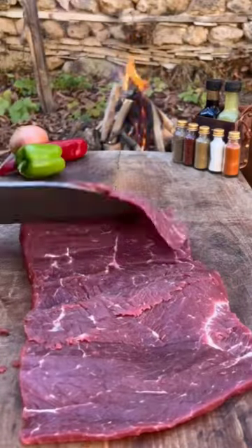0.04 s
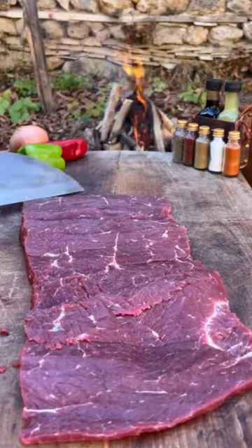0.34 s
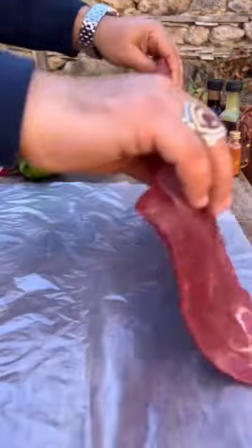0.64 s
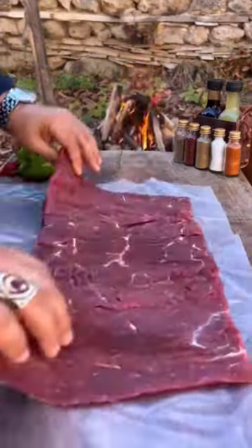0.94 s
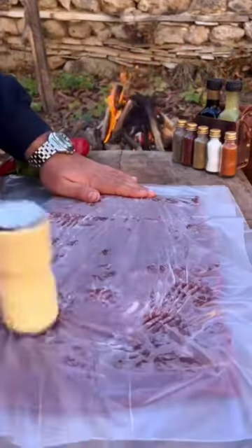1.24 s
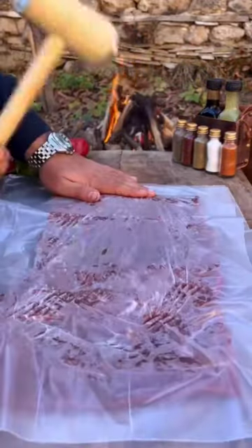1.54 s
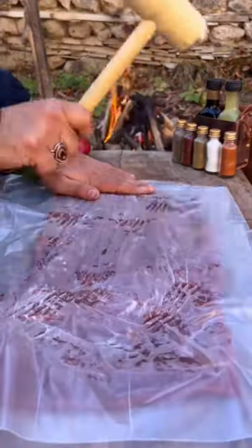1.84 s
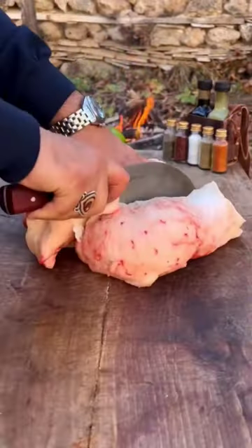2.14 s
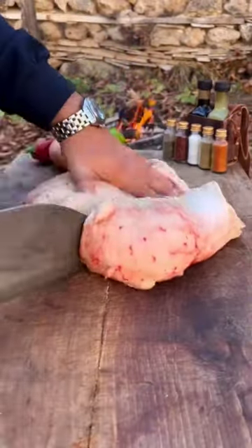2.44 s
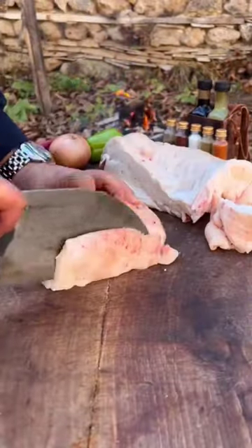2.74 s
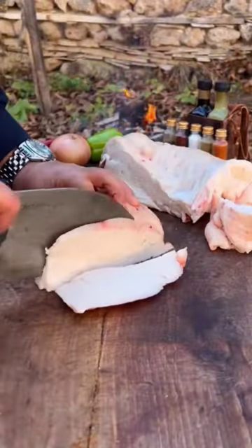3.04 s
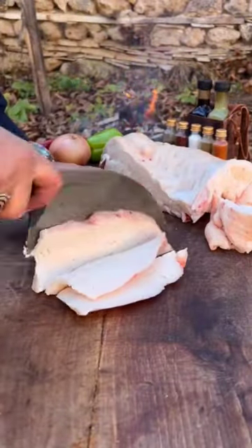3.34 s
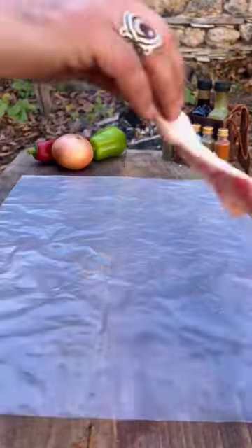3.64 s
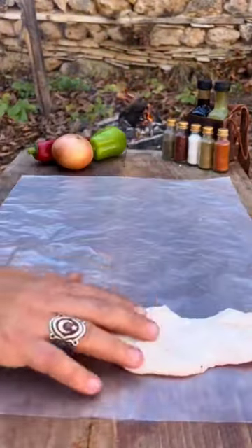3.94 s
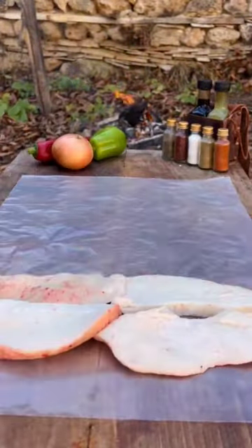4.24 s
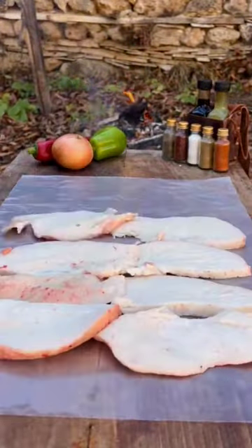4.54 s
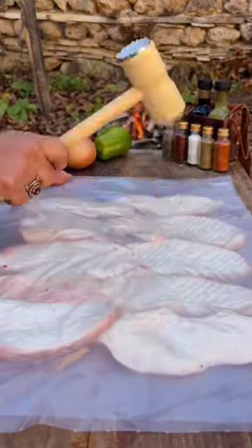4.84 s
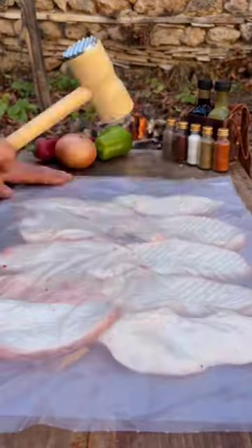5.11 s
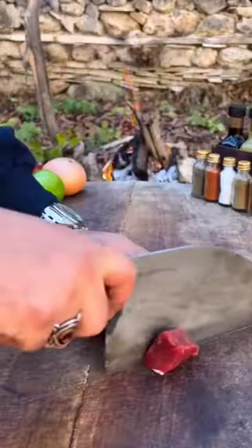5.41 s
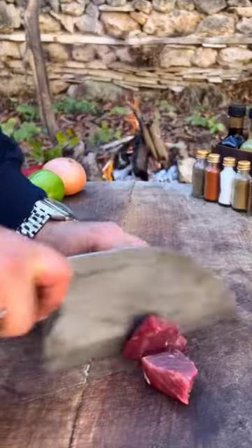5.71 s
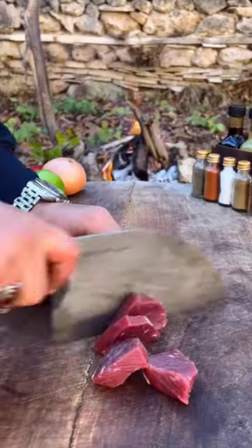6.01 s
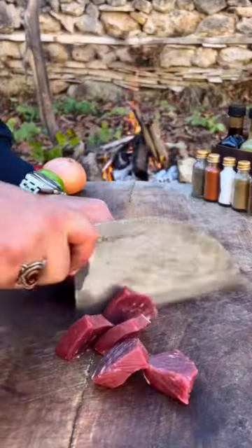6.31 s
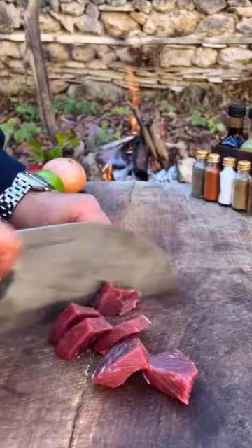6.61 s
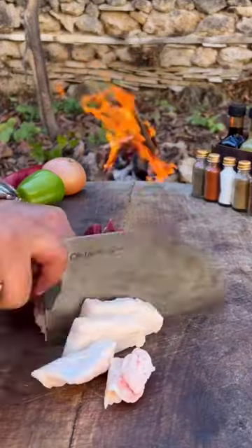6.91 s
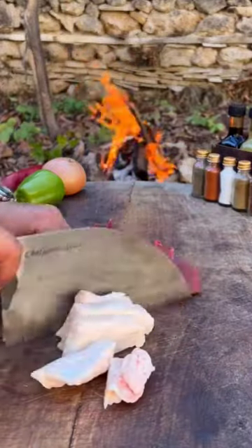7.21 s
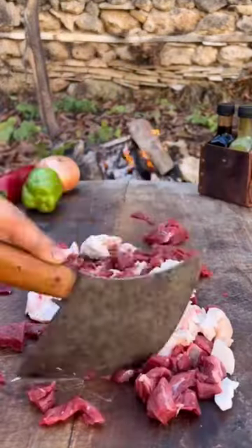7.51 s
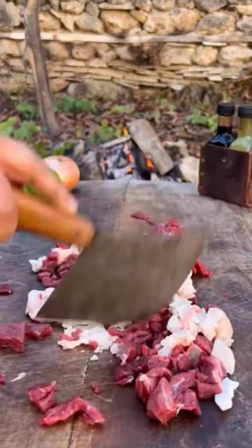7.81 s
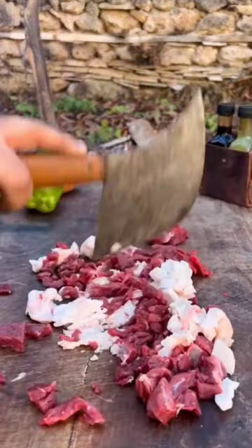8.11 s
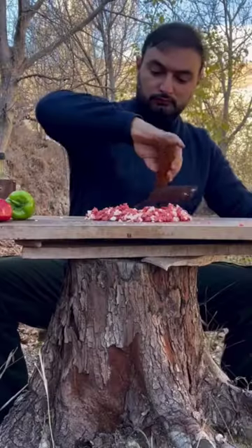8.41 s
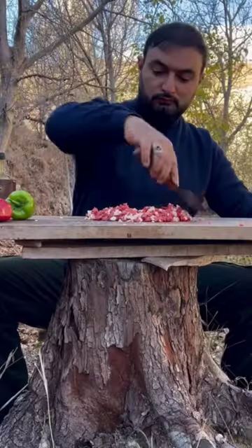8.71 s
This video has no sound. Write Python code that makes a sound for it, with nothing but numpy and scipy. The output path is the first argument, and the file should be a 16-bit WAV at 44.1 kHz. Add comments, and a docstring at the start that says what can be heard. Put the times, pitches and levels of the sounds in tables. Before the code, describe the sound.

Outdoors, a small bird twitters briefly and plastic film crinkles. Close by, a mallet pounds meat six times in quick succession, making a thick wooden table knock. A cleaver slices softly, then a second, duller run of mallet blows follows. Louder rasping slices lead into a fast burst of chopping and a few lighter, more distant chops. A faint low rumble of open air lies underneath.

```python
"""Meat on a wooden table outdoors

Close by, a mallet pounds meat under plastic film and the thick table rings in damped modes.
A cleaver saws slices with a grainy rasp, then minces in a quick run; the last chops are farther off.
Film crinkles and wet meat ticks and peels. A small bird twitters at the start and a faint whir
comes in at the end, over the low rumble of open air."""
import sys
import numpy as np
from scipy import signal
from scipy.fft import rfft, irfft, next_fast_len
from scipy.io import wavfile
from scipy.ndimage import uniform_filter1d, map_coordinates

SR = 44100
rng = np.random.default_rng(int(sys.argv[2]) if len(sys.argv) > 2 else 0)


def dump_mix(stems):
    """Bounce the given channels to the path in sys.argv[1] as a 16-bit WAV at rate SR."""
    frames = np.atleast_2d(stems).T  # one column per channel
    limited = np.clip(frames, -1, 1)  # hard clip at full scale
    pcm = np.round(limited * 32767).astype(np.int16)
    wavfile.write(sys.argv[1], SR, pcm)


N = 386316
T = np.arange(N) / SR
BLOW_N, LEAD_N = SR // 6, SR // 40  # samples in one blow, and before its contact
AGE_S = (np.arange(BLOW_N) - LEAD_N) / SR  # time since contact

# tool dragging on meat and wood: freq_hz, density_db
DRAG_SPECTRUM = [(53, -43.5), (90, -6.5), (124, -12), (199, 5), (293, -3.5), (333, -11), (389, 1), (530, 0),
                 (730, -22), (800, -11.5), (1040, -37.5), (1760, -120)]
# smack of a contact: freq_hz, density_db
SMACK_SPECTRUM = [(100, -39.5), (400, -25.5), (1000, 9.5), (3000, 11.5), (5000, -0.5), (8000, -8.5),
                  (15000, -37)]
# plastic film: freq_hz, density_db
CRINKLE_SPECTRUM = [(290, -45.5), (500, -15.5), (545, 0), (1240, 0), (3060, -2.5), (4070, -1), (4910, -3),
                    (7780, 0.5), (15500, -12.5)]


def mallet():
    """The head squeezes air from under the film, slaps it, and bears down again through the meat."""
    # blows: start_s, thud_db, knock_db, snap_db, hardness_db, rebound_gain_db
    pounds = [(1.0716,-27.5,-28.5,-6,0,-4), (1.236,-28,-29.5,-2,4,4), (1.406,-23.5,-26,-4.5,5.5,-2.5),
              (1.5637,-19.5,-27,-4.5,4,-8), (1.7257,-16,-22.5,-5,0,-16.5),
              (1.889,-18.5,-20.5,-7.5,-3,-19.5), (4.6076,-19.5,-26.5,-20,-8,-3.5),
              (4.7499,-16.5,-18,-15.5,-5.5,-12.5), (4.883,-18,-19.5,-24,-4.5,-28),
              (5.02,-19,-23.5,-16,-6,-17.5), (5.142,-18,-21,-17.5,-10,-10.5),
              (5.2807,-20,-19.5,-19.5,-2.5,-14)]
    # slap of the film: freq_hz, density_db
    snap_spectrum = [(2500, -16), (5100, -8.5), (6500, -3), (8500, 2), (11500, -12.5), (14000, -14.5),
                     (15500, -8.5)]
    # crack of the head: freq_hz, density_db
    crack_spectrum = [(700, -20.5), (1400, 9), (1800, -2.5), (2600, -6), (3100, -4), (3500, -3), (4200, -3),
                      (5200, -18.5), (8000, -24)]
    out = np.zeros(N)
    for s, thud_db, knock_db, snap_db, hardness_db, rebound_db in pounds:
        crack_db = thud_db - 12 + hardness_db
        tilt_db_oct = -6.5 + 2.3 * hardness_db  # harder is brighter
        ring_scale = .55 * amp(-.23 * hardness_db)  # softer rings longer
        envelope = swell(.0026, .014) + amp(-24) * swell(.022, .1)
        add(out, s + .001, amp(snap_db - 12) * envelope * contact(snap_spectrum, depth_db=2))
        add(out, s + .0012, amp(crack_db) * burst(envelope * contact(crack_spectrum, depth_db=0)))
        strike = table(thud_db, knock_db, ring_scale, tilt_db_oct, attack_s=.00069, rattle=.54)
        add(out, s + .00107, strike)
        rebound = table(thud_db, knock_db, 1.31 * ring_scale, tilt_db_oct, attack_s=.0023, rattle=1)
        add(out, s + .0115, amp(rebound_db) * rebound)
        add(out, s, amp(thud_db - 25.5) * swell(.062, .11) * noise(DRAG_SPECTRUM))
    return out


def table(thud_db, knock_db, ring_scale, tilt_db_oct, attack_s, rattle, pitch=1):
    """The struck table: low bending modes, higher knocking modes and a dense rattle of planks."""
    # table top: freq_hz, level_db, base_t60_s
    modes = [(118.5, -6.5, 0.063), (168.5, -1.5, 0.076), (240, 0, 0.073), (329, -6, 0.084),
             (471, -1, 0.063), (543.6, -1.5, 0.041), (614, -2.5, 0.04), (799, -7, 0.049),
             (902, -6.5, 0.061), (1130, -13.5, 0.036), (1376, -12, 0.032)]
    # plank rattle: freq_hz, density_db
    wood_spectrum = [(80, -44), (280, -20), (450, 7.5), (900, 2.5), (1400, -12.5), (2200, -22.5),
                     (5000, -40)]
    load = 1 + .05 * rng.standard_normal()  # weight of tool and meat shifts the low modes
    thud = ring(modes[:4], ring_scale, 2 * attack_s, pitch=pitch * load)
    planks = burst(noise(wood_spectrum) * swell(.0023, .095 * ring_scale))
    knock = ring(modes[4:], ring_scale, attack_s, tilt_db_oct, pitch) + rattle * planks
    bass_cut = signal.butter(2, 260, "high", fs=SR, output="sos")  # the knock stays clear of the bass
    return amp(thud_db) * thud + amp(knock_db) * burst(signal.sosfilt(bass_cut, knock))


def mincing():
    """The cleaver goes through the mince and bites into the wood with a short crack."""
    # close chops: start_s, force_db, edge_db, ring_scale, tilt_db_oct
    chops = [(7.341,-27,-26,1.18,6.5), (7.4831,-18.5,-8.5,0.67,-2.5), (7.6025,-18,-11,0.65,-2.5),
             (7.7412,-18.5,-13,0.6,2), (7.8562,-19.5,-16,0.65,4.5), (7.9923,-20.5,-26.5,.67,6)]
    # edge contact: freq_hz, density_db
    edge_spectrum = [(100, -34.5), (500, -17), (1300, 12), (2000, -1), (3200, -11.5), (4600, -26.5),
                     (8500, -31.5), (12000, -47), (15500, -44)]
    # wood fibres splitting: freq_hz, density_db
    bite_spectrum = [(1200, -23), (2500, 6), (4000, -2), (5500, -16), (8500, -17), (12000, -35.5)]
    out = np.zeros(N)
    for s, force_db, edge_db, ring_scale, tilt_db_oct in chops:
        envelope = swell(.0047, .018) + amp(-11.5) * swell(.023, .044)
        add(out, s + .0021, amp(edge_db - 6.5) * envelope * contact(edge_spectrum, depth_db=4))
        bite = burst(swell(.005, .016) * contact(bite_spectrum, depth_db=2))
        add(out, s + .0015, amp(edge_db - 31) * bite)
        strike = table(force_db - 11, force_db, ring_scale, tilt_db_oct, attack_s=.0018, rattle=.21)
        add(out, s + .0007, strike)
        add(out, s, amp(force_db - 14) * swell(.022, .11) * noise(DRAG_SPECTRUM))
    return out


def slicing():
    """The edge saws through fibres: tiny slips shake the table and hiss along the blade."""
    # strokes, one list for fat, one for lean: start_s, length_s, rasp_db, drag_db, hiss_db
    cuts = [
        [(1.91,.11,-55.5,-50.5,-66), (2.19,.23,-47.5,-46.5,-58.5), (2.44,0.1,-58,-57.5,-66),
         (2.56,0.21,-62,-53,-81), (2.74,0.18,-49.5,-43.5,-65.5), (3.01,.22,-49,-45.5,-65),
         (3.27,0.14,-66.5,-58.5,-68), (3.4,.17,-45,-50,-59.5)],
        [(5.33,0.071,-46,-45.5,-55), (5.435,0.21,-44,-36,-50), (5.655,.17,-40,-38.5,-50.5),
         (5.85,0.22,-40,-38.5,-51.5), (6.085,0.21,-40,-41.5,-51.5), (6.32,.18,-39.5,-41.5,-51.5),
         (6.525,0.19,-40,-43,-52), (6.725,0.15,-41.5,-39,-51.5), (6.945,0.15,-39.5,-46.5,-53),
         (7.155,0.18,-41.5,-52.5,-55)],
    ]
    # rasp, one list for fat, one for lean: freq_hz, density_db
    rasp_spectra = [
        [(320, -24), (550, -1.5), (590, -22), (679, 3), (748, -10.5), (839, -2), (1160, -7.5), (1410, -4),
         (1680, -18.5), (2020, -7), (2290, -15), (4010, -16.5), (4500, -24), (5850, -27), (9900, -120)],
        [(320, -5), (550, 9), (729, -4.5), (884, 9), (966, -1), (1060, 7), (1150, -7), (1420, 4.5),
         (1640, -12.5), (2020, -5.5), (2330, -12), (2630, -5), (4500, -19), (5850, -55), (9900, -120)],
    ]
    # blade hiss: freq_hz, density_db
    hiss_spectrum = [(2240, -27), (3800, -10), (4180, -1), (5100, -7), (6050, 0.5), (6880, -3.5), (8070, 0),
                     (8810, -2.5), (11900, -13), (14900, -14.5), (15500, -20)]
    # blade breaking through onto the table: start_s, thud_db
    landings = [(2.216,-53.5), (2.79,-48.5), (3.0284,-51), (5.501,-40.5), (5.7148,-37.5), (5.786,-43.5),
                (5.877,-36), (6.13,-36.5), (6.2459,-36.5), (6.575,-47), (6.766,-43)]
    out = np.zeros(N)
    catch = amp(1.5 * wobble(70))  # the edge catches and lets go
    for cut, rasp_spectrum in zip(cuts, rasp_spectra):
        drag = sum(amp(db) * stroke(s, length_s, power=.5) for s, length_s, _, db, _ in cut)
        rasp = sum(amp(db) * stroke(s, length_s, power=.8) for s, length_s, db, _, _ in cut)
        hiss = sum(amp(db) * stroke(s, length_s, power=1) for s, length_s, _, _, db in cut)
        sawing = rasp > 0
        layers = [(drag, DRAG_SPECTRUM, 400, .99, 2.5),
                  (rasp, rasp_spectrum, 1800, .8, 3.8),
                  (hiss, hiss_spectrum, 2500, .8, 3.8)]
        for envelope, spectrum, per_s, bed, depth_db in layers:
            slips = patchy(grains(spectrum, per_s, bed, size=2 ** 17), depth_db)
            out[sawing] += envelope[sawing] * slips[:sawing.sum()]
    out *= catch
    for s, db in landings:
        landing = table(db, db - 11, ring_scale=1.15, tilt_db_oct=-2, attack_s=.00073, rattle=1.6)
        add(out, s + .00076, landing)
    return out


def far_chops():
    """Lighter chops from farther off knock a little higher and leave the blade ringing."""
    # far chops: start_s, force_db, edge_db, ring_scale, tilt_db_oct
    chops = [(8.4353,-34,-24.5,0.9,4.5), (8.5764,-36.5,-26,0.98,-20), (8.5956,-36,-34.5,1,-35),
             (8.736,-31,-26,0.96,-16)]
    # cleaver blade: freq_hz, level_db, base_t60_s
    blade_modes = [(500.4, 10, 0.12), (855, -15, 0.21), (1670, 5.5, 0.051), (2048, -6.5, 0.2),
                   (2710, -17, 0.27), (6960, -32, 0.086)]
    out = np.zeros(N)
    for s, force_db, edge_db, ring_scale, tilt_db_oct in chops:
        envelope = swell(.003, .024) + amp(-24) * swell(.0047, .25)
        add(out, s + .00131, amp(edge_db - 8.5) * envelope * contact(SMACK_SPECTRUM, depth_db=3.5))
        thud_db = force_db - 21
        strike = table(thud_db, force_db, ring_scale, tilt_db_oct, attack_s=.0018, rattle=.55, pitch=1.14)
        add(out, s + .0015, strike)
        add(out, s + .00108, amp(edge_db - 13.5) * ring(blade_modes, ring_scale=.66, attack_s=.0023))
    return out


def handling():
    """Film crinkles under the hand and meat flops on the table."""
    # sweeps over the film: start_s, length_s, level_db
    sweeps = [(0.492,0.098,-63), (0.669,0.14,-51.5), (0.8,.24,-53.5), (3.768,0.072,-51.5), (4.145,0.11,-71)]
    # meat laid down, hand bumps: start_s, smack_db, thud_db, knock_db, ring_scale
    bumps = [(0.209,-31.5,-48.5,-46.5,1.34), (0.3492,-28,-42.5,-48,1.4), (0.9975,-24,-52.5,-53.5,1),
             (1.934,-42,-39.5,-60,1.1), (3.792,-24.5,-45.5,-36,0.84), (4.4807,-29,-54.5,-56,.6),
             (5.168,-18,-44,-36,0.83), (8.1305,-36.5,-62,-51,0.25), (8.206,-34,-41,-42.5,0.56)]
    crinkle = patchy(grains(CRINKLE_SPECTRUM, per_s=1500, bed=.9, size=N), depth_db=2)
    out = crinkle * sum(amp(db) * stroke(s, length_s, power=.45) for s, length_s, db in sweeps)
    for s, smack_db, thud_db, knock_db, ring_scale in bumps:
        add(out, s + .0022, amp(smack_db - 19.5) * swell(.0032, .06) * noise(SMACK_SPECTRUM))
        bump = table(thud_db, knock_db, ring_scale, tilt_db_oct=-2.5, attack_s=.00045, rattle=.9)
        add(out, s + .001, bump)
    return out


def ticks():
    """Film and wet surfaces tick as they part: a few clear ticks among faint random ones."""
    # clear ticks: start_s, level_db
    clear_ticks = [(0.172,-39.5), (0.45,-43), (0.96,-33.5), (1.175,-45.5), (1.8195,-39), (2.0705,-35.5),
                   (3.7392,-41), (3.9359,-52), (3.9725,-47.5), (4.1602,-42.5), (4.1954,-37), (4.372,-38.5),
                   (5.3115,-39), (7.459,-46), (7.882,-36.5)]
    faint_per_s, faint_db, spread_db = 4, -45.5, .5
    out = np.zeros(N)
    envelope = swell(.0036, .014) + amp(-13) * swell(.0027, .063)
    for s, db in clear_ticks:
        add(out, s + .0011, amp(db - 8.5) * envelope * noise(CRINKLE_SPECTRUM))
    onsets = rng.random(N) < faint_per_s / SR
    impulses = onsets * amp(faint_db + spread_db * rng.standard_normal(N))
    tick = swell(.0053, .045) * noise(CRINKLE_SPECTRUM)
    return out + signal.fftconvolve(impulses, tick / np.abs(tick).max())[:N]


def squelches():
    """Wet meat peels off the mallet or blade as it lifts."""
    # lifts: start_s, length_s, level_db
    lifts = [(1.655,0.058,-63), (4.789,0.066,-67.5), (5.156,0.065,-61), (7.681,0.037,-64.5),
             (7.888,0.067,-62), (8.229,0.058,-68)]
    # wet peeling: freq_hz, density_db
    peel_spectrum = [(500, -13.5), (2000, -35), (4200, 5.5), (8000, -4.5), (15000, -7)]
    out = np.zeros(N)
    for s, length_s, db in lifts:
        envelope = np.sin(np.pi * np.clip(AGE_S / length_s, 0, 1))
        add(out, s, amp(db) * envelope * grains(peel_spectrum, per_s=760, bed=.27))
    return out


def bird():
    """Six whistled chirps, each a rise and a quick drop, then closing notes; foliage smears them."""
    # closing notes: start_s, length_s, start_hz, end_hz, level_db
    notes = [(0.333,0.048,2130,2790,-46), (0.37,0.039,4150,2830,-49), (.456,0.02,2970,1730,-43.5),
             (0.548,0.11,7030,6770,-61)]
    period_s, rise_s, drop_s = .056, .022, .011
    out = np.zeros(N)
    for s in .0015 + period_s * np.arange(6):
        rise_db, drop_db = 2 * rng.standard_normal(2) + [-48.5, -46]
        top_hz = 8530 * (1 + .025 * rng.standard_normal())
        add(out, s - rise_s, whistle(rise_s, start_hz=6200, end_hz=top_hz, db=rise_db))
        add(out, s, whistle(drop_s, start_hz=top_hz, end_hz=3400, db=drop_db))
    for s, *note in notes:
        add(out, s, whistle(*note))
    foliage = (rng.standard_normal(BLOW_N) * swell(.001, t60_s=.07))[LEAD_N:]
    return out + amp(-8) * signal.fftconvolve(out, foliage / np.linalg.norm(foliage))[:N]


def whistle(length_s, start_hz, end_hz, db):
    """One gliding note."""
    progress = np.clip(AGE_S / length_s, 0, 1)
    phase = 2 * np.pi * np.cumsum(start_hz * (end_hz / start_hz) ** progress) / SR
    return amp(db) * np.sin(np.pi * progress) * np.sin(phase)


def whir():
    """A faint narrow band of noise that wanders in pitch."""
    # course of the whir: time_s, pitch_hz, level_db
    course = [(8.133, 1550, -65), (8.171, 1780, -55.5), (8.268, 1650, -53.5), (8.35, 1530, -61.5),
              (8.622, 1550, -69), (8.75, 1750, -51)]
    # skirt around its pitch: offset_hz, density_db
    skirt = [(90, 0), (300, -14), (1500, -32), (5000, -50)]
    s, hz, db = np.transpose(course)
    phase = 2 * np.pi * np.cumsum(np.interp(T, s, hz)) / SR
    return amp(np.interp(T, s, db, left=-120)) * noise(skirt, N) * np.sin(phase)


def open_air():
    """Low rumble and soft hush from all around, alike at both ears only in the bass."""
    # air levels: time_s, rumble_db, hush_db
    levels = [(0,-57.5,-61.5), (.7,-58.5,-67.5), (2.9,-60,-62), (4.2,-61,-69), (5.2,-64.5,-68),
              (6.1,-53.5,-58.5), (7.1,-54,-60.5), (7.4,-65,-69), (8.05,-64,-72.5), (8.2,-59.5,-62.5),
              (8.76,-57,-66)]
    # rumble: freq_hz, density_db
    rumble_spectrum = [(13, -35.5), (22, -26), (65, 5), (75, -2.5), (92, 0), (129, -4.5), (157, -4.5),
                       (400, -16.5), (520, -57.5), (880, -120)]
    # hush: freq_hz, density_db
    hush_spectrum = [(120, -33.5), (250, -12), (450, -3), (1000, -9.5), (2200, -15.5), (5500, -20.5),
                     (8000, -22), (11000, -25.5), (15500, -30.5)]
    # stereo width: freq_hz, side_gain_db
    width = [(70, -28), (220, -14), (600, -6), (4000, -5)]
    s, rumble_db, hush_db = np.transpose(levels)
    rumble, hush = amp(np.interp(T, s, rumble_db)), amp(np.interp(T, s, hush_db))
    mid, side = [rumble * noise(rumble_spectrum, N) + hush * noise(hush_spectrum, N) for _ in range(2)]
    side = coloured(side, width)
    return np.array([mid + side, mid - side])


def ring(modes, ring_scale, attack_s, tilt_db_oct=0, pitch=1):
    """Damped modes; each spot struck excites them a little differently."""
    t = np.maximum(AGE_S, 0)
    hz, db, t60_s = np.transpose(modes)[:, :, None]
    scatter_db = 2 * rng.standard_normal(hz.shape)
    detune = 1 + .008 * rng.standard_normal(hz.shape)
    sign = (-1) ** np.arange(len(modes))[:, None]
    gain = sign * amp(db + scatter_db + tilt_db_oct * np.log2(hz / hz[0]))
    decay = np.exp(-np.log(1000) * t / (t60_s * ring_scale))
    tones = gain * decay * np.sin(2 * np.pi * hz * pitch * detune * t)
    return burst(tones.sum(axis=0) * (1 - np.exp(-t / attack_s)))


def contact(spectrum, depth_db):
    """Noise for one blow, uneven in colour by depth_db."""
    return patchy(noise(spectrum), depth_db)


def patchy(x, depth_db):
    """Resonances shift as the contact moves: random gain over frequency and time, rms 1 out."""
    bins = signal.stft(x, nperseg=512)[2]
    field = uniform_filter1d(rng.standard_normal(bins.shape), size=3, axis=0)
    field = uniform_filter1d(field, size=24, axis=1)
    bins = bins * amp(depth_db * unit(field))
    return unit(signal.istft(bins, nperseg=512)[1][:len(x)])


def stroke(start_s, length_s, power):
    """A hand speeds up and slows to a stop; its noise grows as a power of the speed."""
    out = np.zeros(N)
    moving = (T > start_s) & (T < start_s + length_s)
    speed = np.abs(np.sin(np.pi * (T[moving] - start_s) / length_s))
    out[moving] = speed ** power
    return out


def swell(rise_s, t60_s):
    """Grows 60 dB in rise_s up to the contact, then dies away."""
    fall = np.where(AGE_S < 0, -AGE_S / rise_s, AGE_S / t60_s)
    return amp(-60 * np.minimum(fall, 10))


def grains(spectrum, per_s, bed, size=BLOW_N):
    """Random tiny snaps on a bed of smooth noise, rms 1."""
    snaps = (rng.random(size) < per_s / SR) * rng.standard_normal(size)
    return unit(coloured(unit(snaps) + bed * rng.standard_normal(size), spectrum))


def noise(spectrum, size=BLOW_N):
    """Coloured noise, rms 1."""
    return unit(coloured(rng.standard_normal(size), spectrum))


def coloured(x, spectrum):
    """Filter by (freq_hz, gain_db) points on a log axis."""
    size = next_fast_len(len(x) + 2048)
    hz, db = np.transpose(spectrum)
    gain = amp(np.interp(np.log(np.fft.rfftfreq(size, 1 / SR) + 1), np.log(hz), db))
    return irfft(rfft(x, size) * gain, size)[:len(x)]


def wobble(knots_per_s):
    """A smooth random curve."""
    return map_coordinates(rng.standard_normal(int(N * knots_per_s / SR) + 4), [T * knots_per_s])


def amp(db):
    """Decibels to gain."""
    return 10 ** (np.asarray(db) / 20)


def unit(x):
    """Scale to rms 1."""
    return x / np.sqrt(np.mean(x ** 2) + 1e-20)


def burst(x):
    """Scale to the energy of 40 ms at rms 1."""
    return x / np.sqrt(np.sum(x ** 2) / (.04 * SR) + 1e-20)


def add(track, contact_s, blow):
    """Mix a blow into the track with its contact at contact_s."""
    start = round(contact_s * SR) - LEAD_N
    blow = blow[max(-start, 0):]
    part = track[max(start, 0):][:len(blow)]
    part += blow[:len(part)]


def spread(mid, width):
    """A centred source, widened by a few weak reflections."""
    delays_s = [.0011, .0037, .0082]
    echoes = sum(np.pad(mid, (round(s * SR), 0))[:N] for s in delays_s) / np.sqrt(len(delays_s))
    side = coloured(echoes, width)
    return np.array([mid + side, mid - side])


def scene():
    """Blows and bird are nearly mono, rubbing is wider, open air is widest."""
    # width of blows and bird: freq_hz, side_gain_db
    blow_width = [(150, -30), (600, -21), (3000, -20), (9000, -15)]
    # width of rubbing and whir: freq_hz, side_gain_db
    rub_width = [(200, -30), (600, -17), (2000, -12), (7000, -7)]
    narrow = spread(mallet() + mincing() + far_chops() + bird(), blow_width)
    wide = spread(handling() + ticks() + squelches() + slicing() + whir(), rub_width)
    return narrow + wide + open_air()


def record(dry):
    """Rounds off the loudest peaks and cuts the top of the treble."""
    ceiling, top_hz = .68, 15600
    rounded = dry / (1 + np.abs(dry / ceiling) ** 6) ** (1 / 6)
    lowpass = 1 / (1 + (np.fft.rfftfreq(N, 1 / SR) / top_hz) ** 90)
    return irfft(rfft(rounded) * lowpass, N)


dry = scene()
out = record(dry)
dump_mix(out)
```